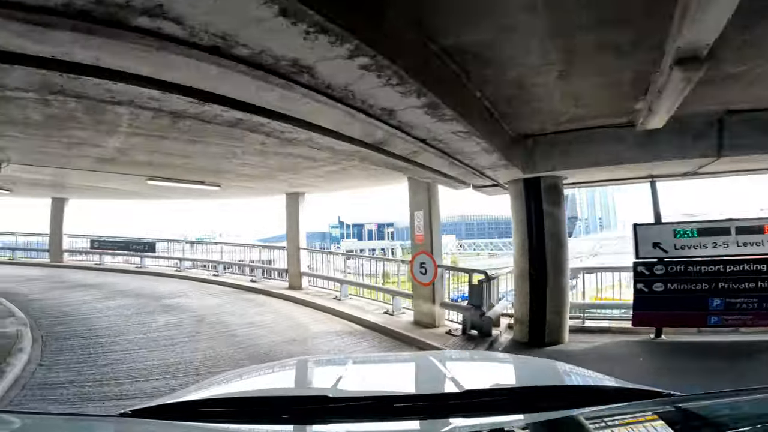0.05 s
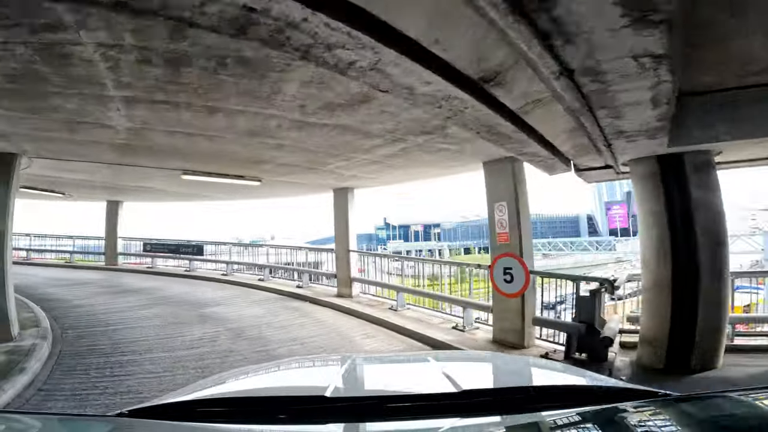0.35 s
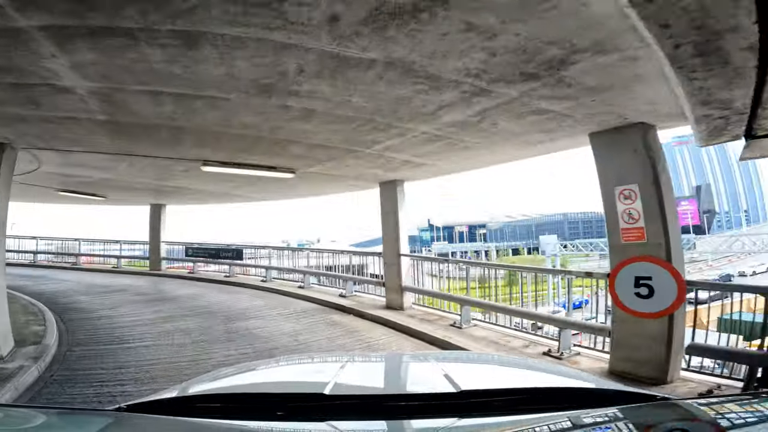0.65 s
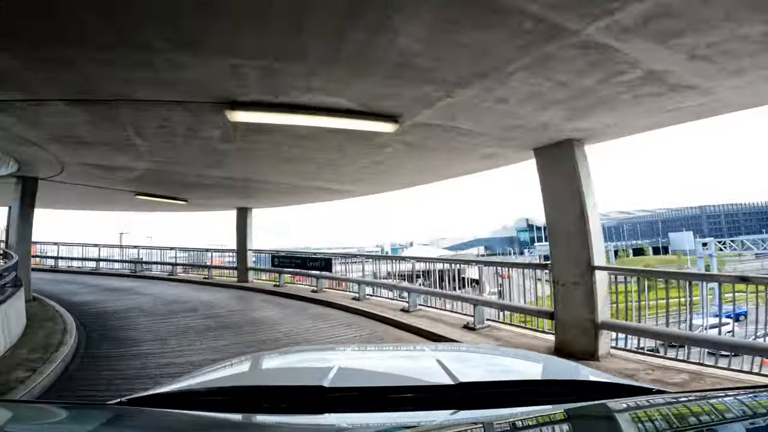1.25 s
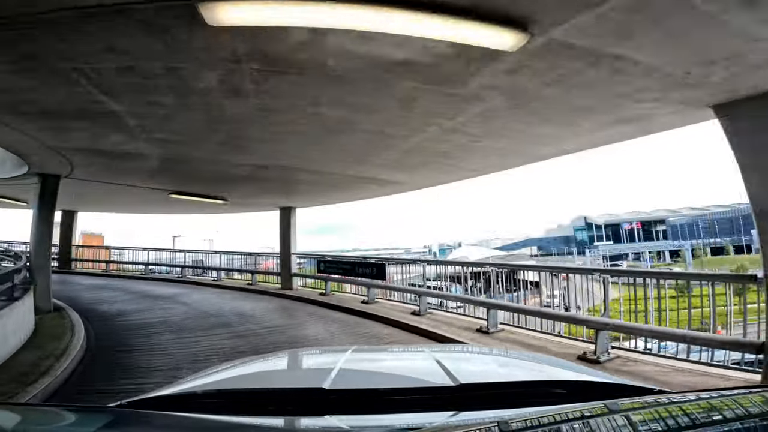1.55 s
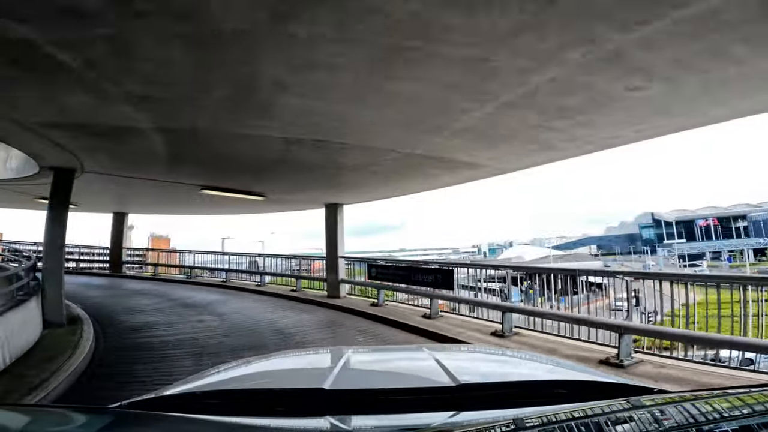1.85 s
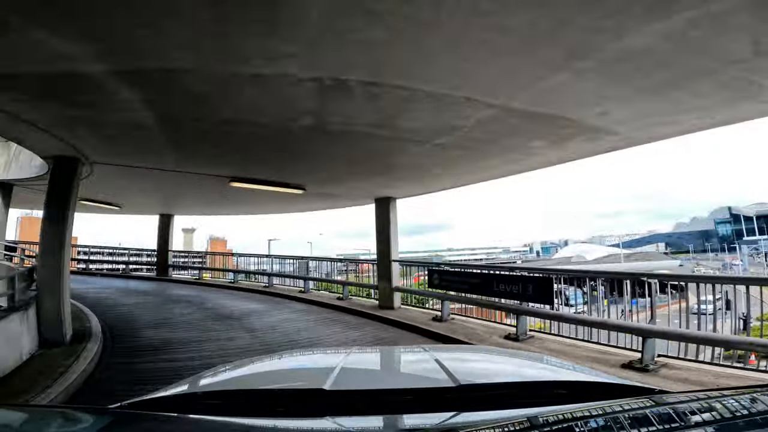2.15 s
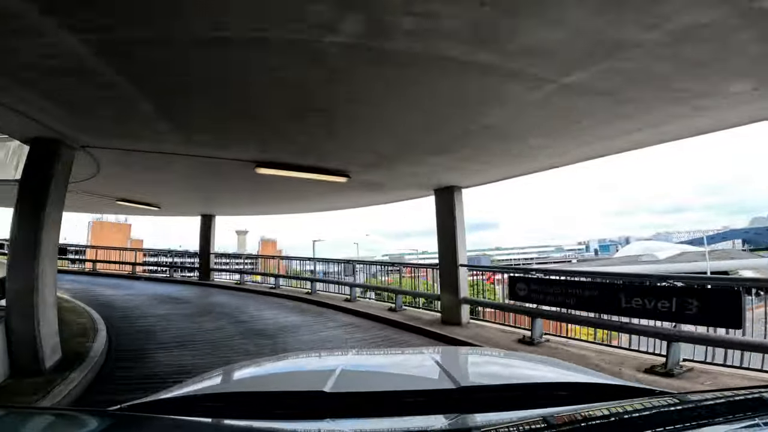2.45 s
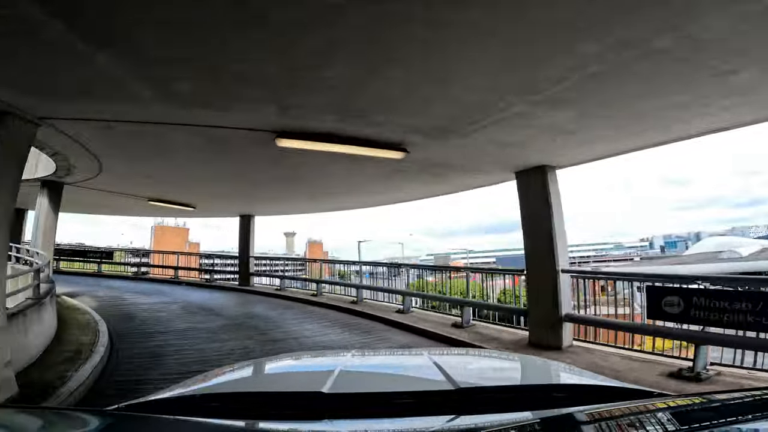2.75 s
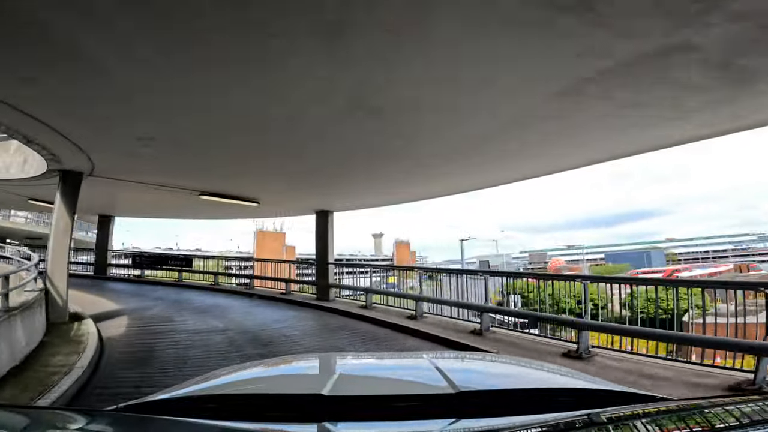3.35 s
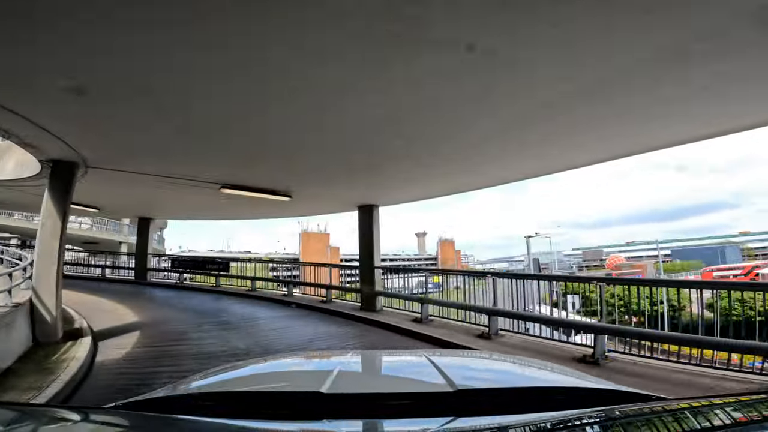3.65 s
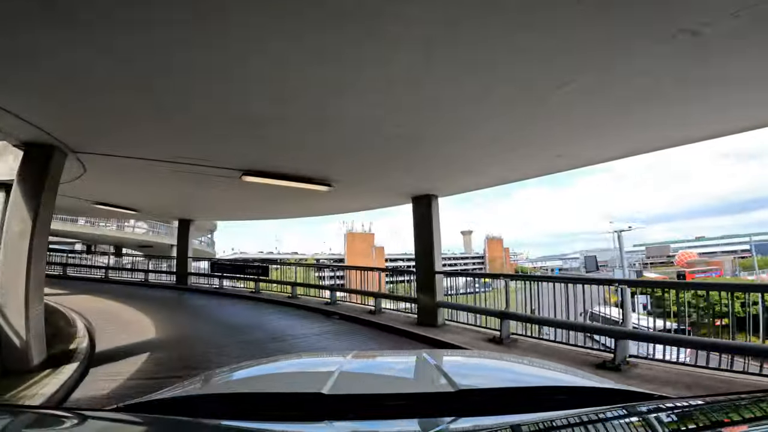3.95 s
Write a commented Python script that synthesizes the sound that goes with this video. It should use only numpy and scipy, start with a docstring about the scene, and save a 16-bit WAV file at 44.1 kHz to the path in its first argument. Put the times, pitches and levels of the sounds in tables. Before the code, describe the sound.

A car rumbles and thumps up a concrete ramp, with brief tyre squeaks, heard from inside.

```python
"""Car on a car park ramp

A car climbs the spiral concrete ramp of a covered car park, heard from inside. The body rumbles and
thumps over uneven concrete, the tyres drone and hiss over a faint engine hum, and now and then a tyre
scuffs over a joint. The sound narrows as the car leaves the open deck."""
import sys
import numpy as np
from scipy import signal
from scipy.fft import rfft, irfft
from scipy.io import wavfile
from scipy.ndimage import uniform_filter1d

SR = 44100
rng = np.random.default_rng(int(sys.argv[2]) if len(sys.argv) > 2 else 0)


def int16_out(signal):
    """Quantize to a 16-bit WAV file."""
    q = np.round(np.clip(np.atleast_2d(signal).T, -1, 1) * 32767)
    wavfile.write(sys.argv[1], SR, q.astype(np.int16))


N = 176400
TIME_S = np.arange(N) / SR
FREQ_HZ = np.maximum(np.arange(N // 2 + 1) * SR / N, 1)


def from_db(db):
    """Decibels to gain."""
    return 10 ** (np.asarray(db) / 20)


def unit_rms(x):
    """Scale to rms 1."""
    return x / np.sqrt(np.mean(x ** 2) + 1e-20)


def curves(rows):
    """Each column after the time column, interpolated per sample."""
    times_s, *columns = np.transpose(rows)
    return [np.interp(TIME_S, times_s, column) for column in columns]


def colour(points):
    """Gain per frequency from (Hz, dB) points."""
    hz, db = np.transpose(points)
    return from_db(np.interp(np.log(FREQ_HZ), np.log(hz), db))


def band(low_hz, high_hz, order=8):
    """Gain per frequency of a steep band-pass."""
    return ((1 + (low_hz / FREQ_HZ) ** (2 * order)) * (1 + (FREQ_HZ / high_hz) ** (2 * order))) ** -.5


def noise(gain):
    """Noise shaped by a gain per frequency, rms 1."""
    return unit_rms(irfft(rfft(rng.standard_normal(N)) * gain, N))


def drift(rate_hz, size=N):
    """Random wander: low-passed noise, rms 1."""
    pole, run_in = np.exp(-2 * np.pi * rate_hz / SR), SR // 10
    white = rng.standard_normal(size + run_in)
    return unit_rms(signal.lfilter([1], [1, -2 * pole, pole * pole], white)[run_in:])


def resonance(hz, width_hz, size=N):
    """Noise-driven ring, rms 1; its centre may move."""
    phase = 2 * np.pi * np.cumsum(hz * np.ones(size)) / SR
    return unit_rms(drift(width_hz, size) * np.cos(phase) + drift(width_hz, size) * np.sin(phase))


def steady(x, window_s):
    """Even out swells by dividing by the running rms."""
    return x / np.sqrt(uniform_filter1d(x * x, max(int(window_s * SR), 2)) + 1e-9)


# Rolling noise per band (time [s], level [dB])
BODY_RUMBLE = [(0, -17.5), (.1, -17), (.3, -9.5), (.56, -16.5), (.8, -10), (1.0, -14.5), (1.3, -18),
               (1.64, -12), (1.8, -15), (2.0, -13.5), (2.45, -15), (2.7, -15.5), (3.1, -16.5), (3.45, -19),
               (3.56, -14.5), (4, -18)]
CABIN_BOOM = [(0, -19.5), (.33, -18), (.6, -19), (1.0, -17.5), (1.15, -17), (1.26, -25), (1.35, -10),
              (1.5, -18.5), (1.8, -19), (1.93, -14), (2.28, -19.5), (2.7, -17.5), (3.07, -13),
              (3.25, -16.5), (3.45, -11.5), (3.7, -20), (4, -14)]
TYRE_DRONE = [(0, -30.5), (.25, -19.5), (.5, -25.5), (.65, -24), (.85, -26), (1.18, -17), (1.4, -21.5),
              (1.68, -15.5), (1.95, -25.5), (2.25, -20.5), (2.65, -23.5), (2.88, -18.5), (3.25, -18.5),
              (3.55, -18), (3.7, -19), (4, -15)]
UPPER_DRONE = [(0, -30.5), (.45, -32.5), (.7, -21.5), (.95, -29.5), (1.2, -23.5), (1.5, -29), (2.2, -31),
               (3.1, -25), (3.5, -31), (4, -35.5)]
ROAD_ROAR = [(0.0, -24), (0.2, -26), (0.4, -22), (0.73, -25), (2.04, -22.5), (2.15, -26), (2.33, -24.5),
             (3.97, -24.5), (4.0, -22)]
TREAD_HISS = [(0, -32.5), (.27, -34), (.45, -30), (1.2, -32), (1.6, -30), (2.0, -29.5), (2.45, -30),
              (2.9, -28.5), (3.28, -33.5), (3.6, -31), (4, -28.5)]
TREAD_TREBLE = [(0, -43.5), (.27, -42.5), (.45, -39.5), (1.2, -41.5), (1.65, -41.5), (2.4, -39.5),
                (2.95, -36), (3.28, -39.5), (3.6, -38.5), (4, -37.5)]
# Spectra in the cabin (frequency [Hz], relative density [dB])
ROAD_SPECTRUM = [(7.1, -9), (12, 8), (37, 2), (104, -4), (204, -11), (294, -19), (363, -14.5), (408, -17.5),
                 (1200, -24), (1560, -55), (2640, -120)]
TREAD_SPECTRUM = [(1000, 4.5), (1500, -3), (2000, -6.5), (2500, -8.5), (3100, -9.5), (4000, -15.5),
                  (5200, -18.5), (6300, -23.5), (7400, -32.5), (8500, -46), (10500, -74.5)]
# Tyre and cabin cavities (frequency [Hz], width [Hz], level [dB])
CAVITIES = [(203.7, 40, -31.5), (373, 26, -37.5)]


def rolling():
    """Concrete shakes the body and tyres, cavities ring, and the tread adds a grainy hiss."""
    road, tread = colour(ROAD_SPECTRUM), colour(TREAD_SPECTRUM)
    out = np.zeros(N)
    for levels, low_hz, high_hz in ((BODY_RUMBLE, 21.2, 71), (CABIN_BOOM, 71.6, 133.3),
                                    (TYRE_DRONE, 130.4, 237.5), (UPPER_DRONE, 252, 309),
                                    (ROAD_ROAR, 301, 1094)):
        vibration = steady(noise(road * band(low_hz, high_hz)), window_s=0.25)
        out += from_db(curves(levels)[0]) * vibration
    grain = drift(rate_hz=51)
    out += from_db(curves(TREAD_HISS)[0] + 0.27 * grain) * noise(tread * band(1190, 2704))
    out += from_db(curves(TREAD_TREBLE)[0] + 0.21 * grain) * noise(tread * band(2920, 11000))
    return out + sum(from_db(db) * resonance(hz, width_hz) for hz, width_hz, db in CAVITIES)


# Suspension thumps (onset [s], frequency [Hz], peak level [dB])
THUMPS = [(0.163, 42.2, -0.5), (0.347, 42.2, -9), (0.698, 51.2, -11), (1.887, 53, -5), (3.045, 88.6, -8.5)]


def suspension_thumps(rise_s=0.026):
    """The body swings for a few cycles after each bump."""
    out = np.zeros(N)
    for onset_s, hz, db in THUMPS:
        age_s = np.maximum(TIME_S - onset_s, 0)
        envelope = (age_s / rise_s * np.exp(1 - age_s / rise_s)) ** 3
        out += from_db(db) * envelope * np.sin(2 * np.pi * hz * age_s)
    return out


# Tyre slips (centre [s], sigma [s], rush level [dB], rush tilt [dB/oct], squeal pitch [Hz],
# squeal width [Hz], squeal level [dB], glide [oct/s], tail gain [ratio])
SCUFFS = [(0.336, 0.011, -38, 1, 2400, 230, -27.5, -1.5, .15),
          (0.353, 0.017, -33, 7.5, 2150, 250, -34, -2.5, 0.24),
          (0.369, .012, -34, -1, 1773, 160, -25.5, -1.5, .15),
          (0.698, .012, -37, -3, 2156, 240, -29, 0.5, .1), (0.724, .022, -30, 2, 2106, 360, -22.5, 1, 0.28),
          (0.817, 0.019, -34.5, 1, 1673, 80, -28.5, -1, .2), (1.057, .025, -46, 7, 2217, 200, -35, 0.5, .1),
          (1.296, 0.013, -39, 2, 2730, 260, -37, 0, 0.092),
          (1.389, 0.026, -37.5, 3, 2580, 350, -38, -3, .15),
          (3.393, .012, -28.5, 4, 1478, 130, -21.5, 1.5, 0.18),
          (3.413, 0.015, -27.5, 1.5, 1655, 200, -34, 0.5, 0.53),
          (3.47, 0.014, -29.5, -2, 1483, 90, -30, -1.5, 0.23),
          (3.501, 0.01, -27.5, -1.5, 1430, 70, -18, -0.5, 0.27),
          (3.725, 0.035, -33.5, 1.5, 3330, 300, -34.5, 0, .15),
          (3.752, .016, -36, 4, 2485, 220, -28, -2, 0.3), (3.798, .022, -47, 5, 2327, 130, -32, -1, .2)]
# Rush of slipping rubber before tilt (frequency [Hz], relative density [dB])
RUSH_SPECTRUM = [(500, -49), (1100, -5), (1700, 3.5), (2700, -1.5), (3600, -5), (5500, -14.5),
                 (7300, -23.5), (8800, -38.5), (12000, -70.5)]
GRAIN_DEPTH_DB, TILT_PIVOT_HZ, TAIL_DECAY_S = 2.5, 2500, .08
RASP_WIDTH_HZ, RASP_DB = 480, -4
OVERTONE_RATIO, OVERTONE_DB = 1.9, -13


def tyre_scuffs():
    """Rubber slips in quick runs: a rush and a hoarse squeal swell, fade and ring off the concrete."""
    out, rush_colour = np.zeros(N), colour(RUSH_SPECTRUM)
    grain = from_db(-GRAIN_DEPTH_DB * drift(rate_hz=150))
    for centre_s, sigma_s, rush_db, tilt_db_oct, hz, width_hz, squeal_db, glide_oct_s, tail_gain in SCUFFS:
        near = (TIME_S > centre_s - .15) & (TIME_S < centre_s + .45)
        age_s = TIME_S[near] - centre_s
        size = len(age_s)
        swell = np.exp(-.5 * (age_s / sigma_s) ** 2)
        tail = tail_gain * (age_s > 0) * (1 - swell) * np.exp(-np.abs(age_s) / TAIL_DECAY_S)
        tilt = from_db(tilt_db_oct * np.log2(FREQ_HZ / TILT_PIVOT_HZ))
        rush = grain * noise(rush_colour * tilt)
        pitch_hz = hz * 2 ** (glide_oct_s * np.clip(age_s, -2 * sigma_s, 2 * sigma_s))
        ring = resonance(pitch_hz, width_hz, size)
        rasp = from_db(RASP_DB) * resonance(pitch_hz, RASP_WIDTH_HZ, size)
        overtone = from_db(OVERTONE_DB) * resonance(OVERTONE_RATIO * pitch_hz, RASP_WIDTH_HZ, size)
        squeal = steady(ring + rasp + overtone, window_s=.015)
        out[near] += (swell + tail) * (from_db(rush_db) * rush[near] + from_db(squeal_db) * squeal)
    return out


# Engine hum (time [s], pitch [Hz], level [dB])
ENGINE_HUM = [(0, 180, -26.5), (.25, 178, -24.5), (.6, 190, -32.5), (1.2, 206, -25.5), (1.9, 197, -33),
              (2.9, 200, -23), (3.3, 180, -27), (3.55, 171, -17.5), (4, 168, -26.5)]


def engine_hum(pitch_jitter=0.0109, flutter_db=4.7):
    """A rough hum follows the engine speed."""
    hz, db = curves(ENGINE_HUM)
    phase = 2 * np.pi * np.cumsum(hz * (1 + pitch_jitter * drift(rate_hz=10.7))) / SR
    return from_db(db + flutter_db * drift(rate_hz=5.1)) * np.sin(phase)


# High sizzles (centre [s], sigma [s], frequency [Hz], width [Hz], peak level [dB])
SIZZLES = [(0.436, 0.0058, 8700, 2200, -47.5), (0.647, 0.034, 8000, 2500, -48.5),
           (0.8, 0.035, 6000, 3000, -48), (1.042, 0.03, 6600, 3500, -50), (1.222, 0.017, 6100, 3530, -47.5),
           (1.396, 0.04, 5500, 710, -48), (1.893, 0.04, 5500, 2530, -48)]


def sizzles():
    """Short, soft patches of high hiss come and go."""
    out = np.zeros(N)
    for centre_s, sigma_s, hz, width_hz, db in SIZZLES:
        swell = np.exp(-.5 * ((TIME_S - centre_s) / sigma_s) ** 2)
        out += from_db(db) * swell * noise(np.exp(-2 * ((FREQ_HZ - hz) / width_hz) ** 2))
    return out


# Open-deck whine and airy hiss (time [s], level [dB])
DECK_WHINE = [(0, -62), (.15, -57), (.35, -72), (1.0, -96.5), (4, -110)]
DECK_HISS = [(0, -49), (.4, -50.5), (.8, -67), (1.3, -68.5), (1.8, -83.5), (4, -76)]
# Airy hiss (frequency [Hz], relative density [dB])
DECK_SPECTRUM = [(5000, -4), (8000, -1.5), (10000, -9.5), (13000, -24), (15000, -34)]


def open_deck():
    """A thin whine and an airy hiss die away as the car enters the ramp."""
    whine = from_db(curves(DECK_WHINE)[0]) * resonance(hz=8677, width_hz=17)
    hiss = from_db(curves(DECK_HISS)[0]) * noise(colour(DECK_SPECTRUM))
    return whine + hiss


# Colouring of the diffuse sound (frequency [Hz], gain [dB])
DIFFUSE_EQ = [(30, -7), (70, -18.5), (150, -1.5), (300, 1), (700, -1), (2000, -1.5), (4500, 4.5), (7000, 9)]
# Diffuse sound sent to the side channel (time [s], bass gain [dB], treble gain [dB])
STEREO_WIDTH = [(0, -15.5, -15.5), (.7, -21.5, -17.5), (1.2, -25.5, -17.5), (1.8, -43.5, -26),
                (2.6, -77, -30), (4, -62, -28.5)]
WIDTH_SPLIT_HZ = 720


def scene():
    """Nearly mono mix with a diffuse part that shrinks on the ramp."""
    mid = rolling() + engine_hum() + suspension_thumps() + tyre_scuffs() + sizzles() + open_deck()
    diffuse = rfft(rolling() + tyre_scuffs()) * colour(DIFFUSE_EQ)
    bass_db, treble_db = curves(STEREO_WIDTH)
    bass = from_db(bass_db) * irfft(diffuse * band(15, WIDTH_SPLIT_HZ), N)
    treble = from_db(treble_db) * irfft(diffuse * band(WIDTH_SPLIT_HZ, SR / 2), N)
    side = bass + treble + open_deck()
    return np.array([mid + side, mid - side])


SHELF_HZ, RIGHT_OVER_LEFT_DB, CUTOFF_HZ = 520, 1.4, 13400


def record(dry):
    """The right microphone is a little brighter; peaks are rounded off and the top is cut."""
    shelf_db = RIGHT_OVER_LEFT_DB / (1 + (SHELF_HZ / FREQ_HZ) ** 4)
    shelved = irfft(rfft(dry) * from_db([-shelf_db / 2, shelf_db / 2]), N)
    rounded = shelved / (1 + shelved ** 8) ** (1 / 8)
    return signal.sosfilt(signal.cheby2(12, 70, CUTOFF_HZ, fs=SR, output="sos"), rounded)


dry = scene()
out = record(dry)
int16_out(out)
```